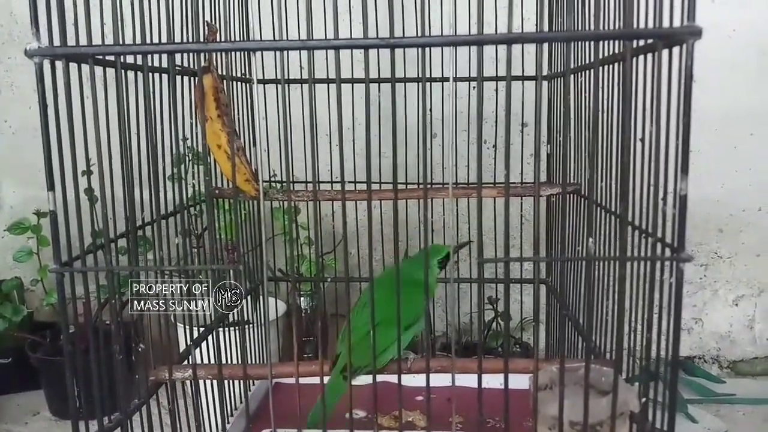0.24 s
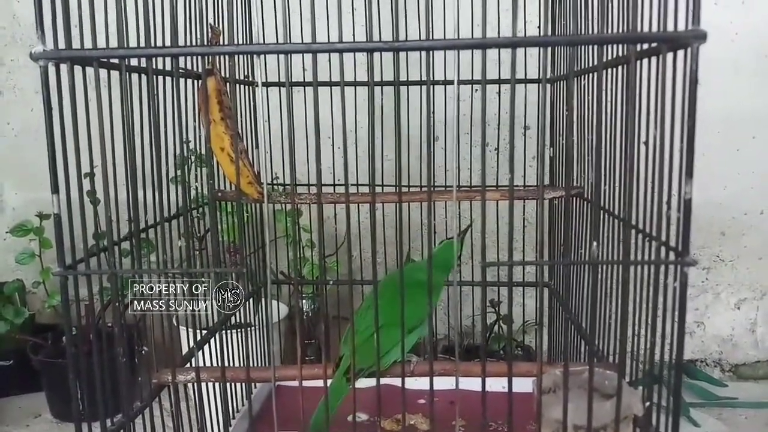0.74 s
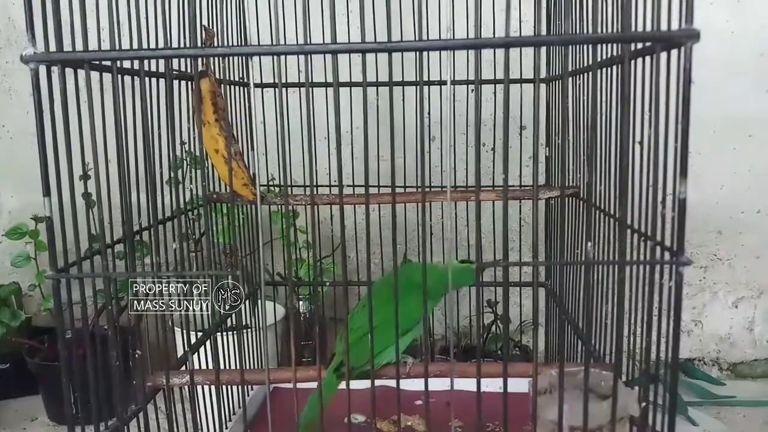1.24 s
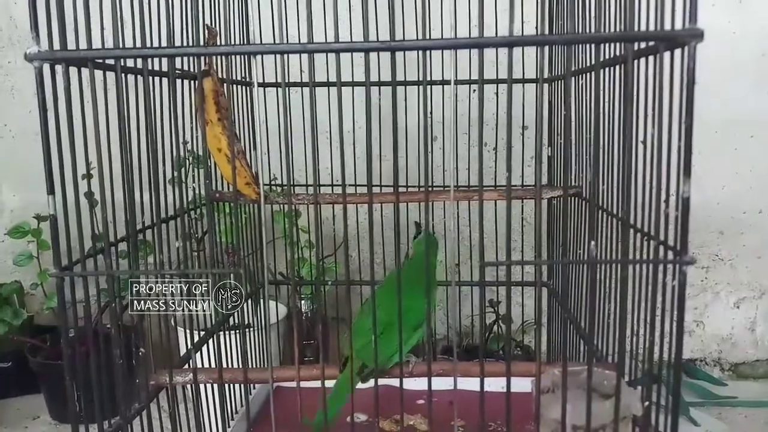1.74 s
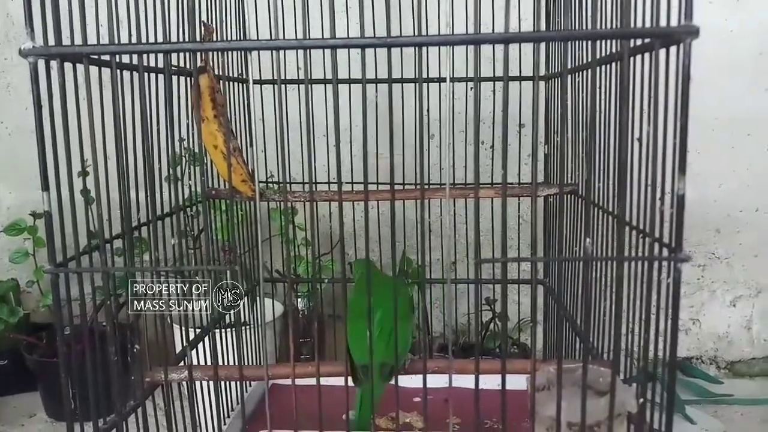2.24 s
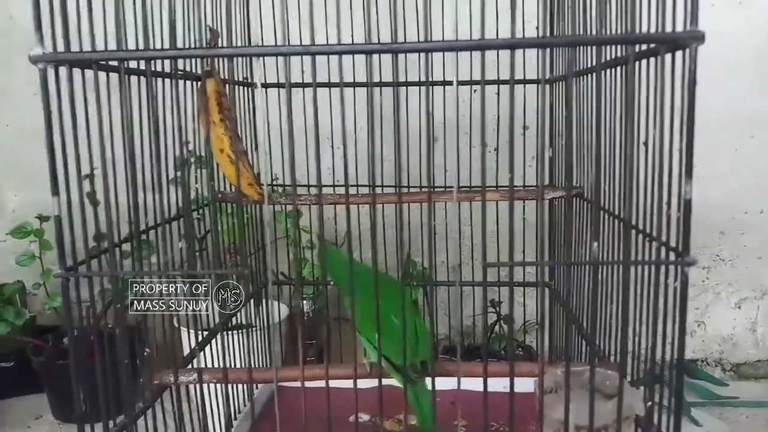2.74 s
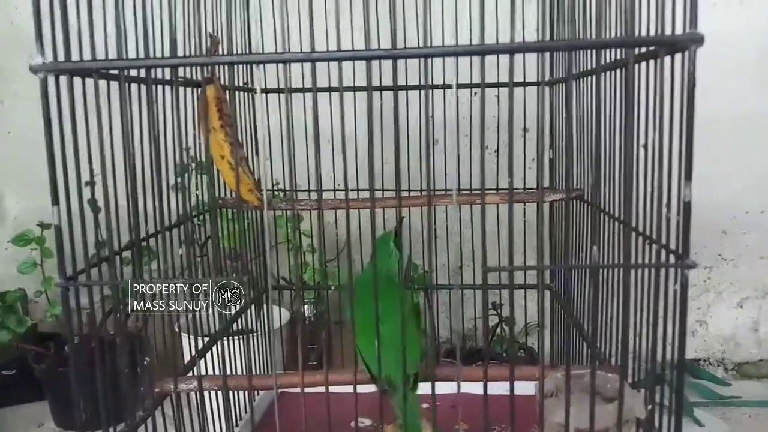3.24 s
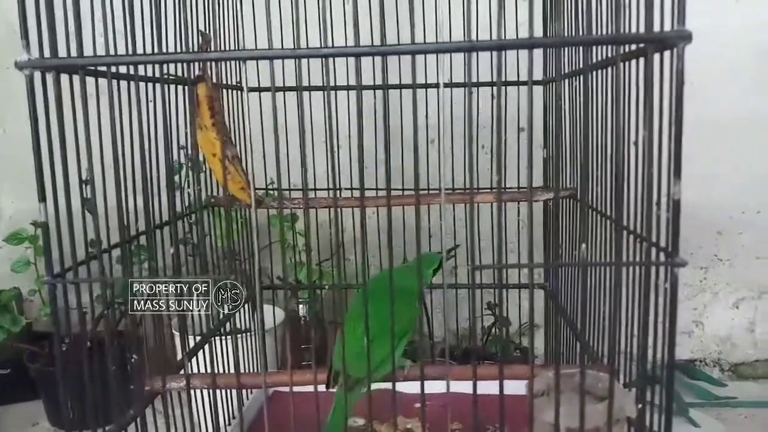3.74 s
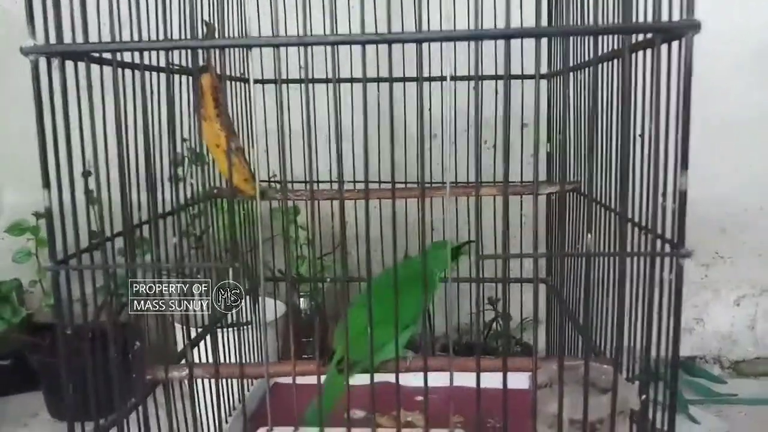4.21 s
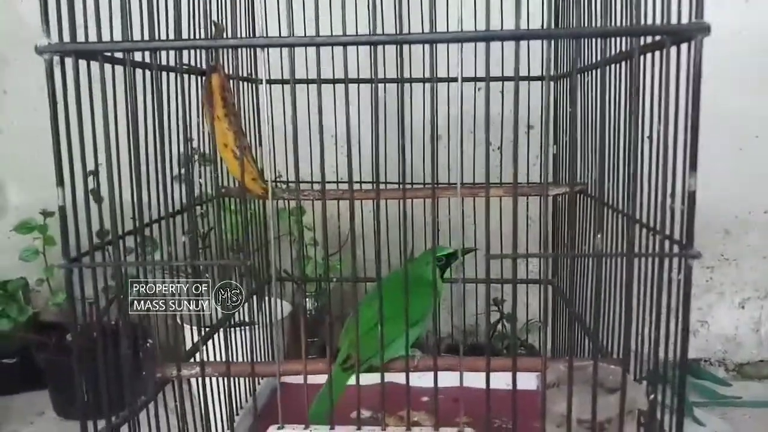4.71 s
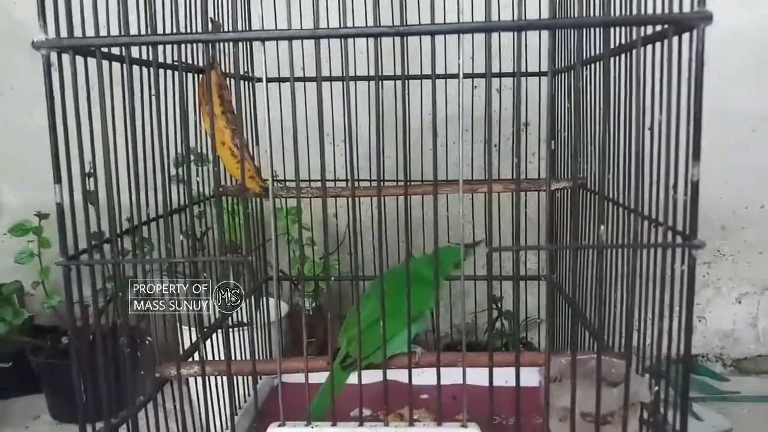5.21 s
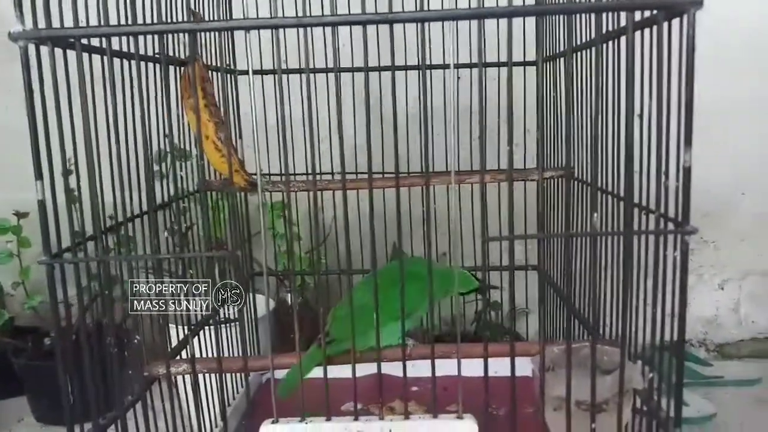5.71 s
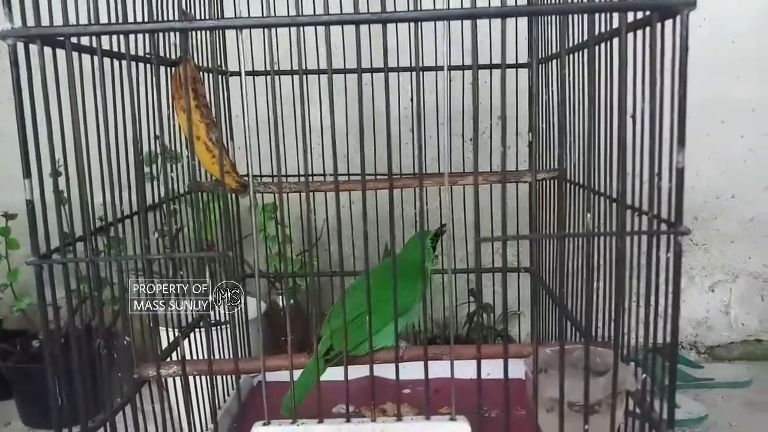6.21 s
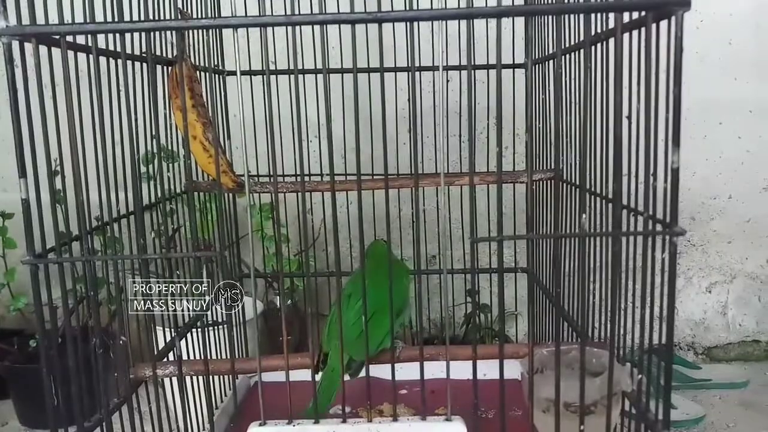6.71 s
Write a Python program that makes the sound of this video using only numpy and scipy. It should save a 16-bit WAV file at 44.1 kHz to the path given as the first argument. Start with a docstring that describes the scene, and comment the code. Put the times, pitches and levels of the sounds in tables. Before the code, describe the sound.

Soft bird chirps, scratchy rasps and light perch hops with ringing wires, then sudden piercing squawks that overload the microphone, over faint room hum.

```python
"""A songbird in a wire cage beside a hard wall, heard on two microphones over a low hum and faint hiss (noise, drones).
Thin whistles (near sines) and sliding chirps open; hops scuff the perch and ring the wires (noise, sines).
Two scratchy slurs climb, then dry rasps rattle (noise, buzz), more chirps and rasps following to the end.
Four loud squawks, two near the middle and two late, come from two coupled harmonic voices;
they overload the microphone and pull its automatic gain down."""
import sys
import numpy as np
from scipy import signal
from scipy.fft import rfft, irfft
from scipy.io import wavfile
from scipy.ndimage import uniform_filter1d

SR = 44100
rng = np.random.default_rng(int(sys.argv[2]) if len(sys.argv) > 2 else 0)


def file_out(sig):
    """Save sig as 16-bit WAV at sys.argv[1]."""
    # one column per channel
    cols = np.atleast_2d(sig).T
    # limit, then scale
    lim = np.clip(cols, -1, 1)
    pcm = np.round(lim * 32767).astype(np.int16)
    wavfile.write(sys.argv[1], SR, pcm)


N = 306936
TIME = np.arange(N) / SR
CUTOFF_HZ = 15400   # top of the recorded band

# spectrum of the dry, scratchy noise in the voice: hz, level_db
RASP_SPECTRUM = [(710, -68), (1200, -34), (1650, -29), (1870, -21.5), (3090, -20), (4160, 2), (4470, -2.5),
                 (5220, -5), (6960, -19), (7400, -33), (8550, -24.5), (14000, -48)]
# response of the vocal tract and open beak: hz, level_db
TRACT_RESPONSE = [(1200, -42), (1800, -44), (2130, -21), (2420, -17), (3000, -1.5), (3600, 8), (4400, 3.5),
                  (5100, -3), (5900, -11.5), (6700, -27.5), (7400, -26), (9000, -17.5), (10200, -32),
                  (13000, -34.5), (15000, -49.5)]


def from_db(db):
    """Amplitude factor of a level in dB."""
    return 10 ** (np.asarray(db) / 20)


def rms_one(x):
    """Scale a sound to rms 1."""
    return x / np.sqrt(np.mean(x ** 2) + 1e-20)


def at_hz(points, hz):
    """Read a table on a log-frequency axis."""
    table_hz, value = np.transpose(points)
    return np.interp(np.log(np.maximum(hz, 1)), np.log(table_hz), value)


def ramp(t, length_s):
    """From 0 to 1 over a given time, then held."""
    return np.clip(t / length_s, 0, 1)


def coloured(x, spectrum):
    """Give a sound a spectrum that falls away beyond its ends; rms 1."""
    hz = np.arange(N // 2 + 1) * SR / N + 1
    low_end = 1 + (.8 * spectrum[0][0] / hz) ** 8
    high_end = 1 + (.8 * hz / spectrum[-1][0]) ** 8
    gain = from_db(at_hz(spectrum, hz)) / np.sqrt(low_end * high_end)
    return rms_one(irfft(rfft(x) * gain, N))


def wobble(rate_hz, size):
    """Random motion up to a given rate, its filter settled beforehand; rms 1."""
    sos = signal.butter(3, min(rate_hz, SR / 4), fs=SR, output="sos")
    return rms_one(signal.sosfilt(sos, rng.standard_normal(size + SR // 4))[SR // 4:])


def stereo_noise(alike):
    """Two white noises with a given likeness (0-1)."""
    mid, side = rng.standard_normal((2, N))
    alike = np.clip(alike, 0, 1)
    return np.sqrt(1 + alike) * mid + np.sqrt(1 - alike) * side * np.array([[1], [-1]])


def add(out, start_s, sound):
    """Mix a sound in at its time."""
    i = max(int(start_s * SR), 0)
    out[i:i + len(sound)] += sound[:N - i]


def drone(hz, width_hz):
    """A tone whose strength and phase wander, which spreads it into a narrow band."""
    phase = 2 * np.pi * hz * TIME
    return wobble(width_hz, N) * np.sin(phase) + wobble(width_hz, N) * np.cos(phase)


def background(hum_db=-42.5, air_db=-53):
    """A steady low rumble with tones that come and go in it, under faint hiss."""
    # low hum of the room: hz, level_db
    hum_spectrum = [(15, -41), (25, -20.5), (81, -4.5), (107, -2.5), (140, -0.5), (181, 0), (248, -5),
                    (297, -6.5), (407, -14.5), (452, -14.5), (574, -13.5), (647, -21), (900, -27),
                    (1170, -46.5), (1980, -120)]
    # faint hiss: hz, level_db
    air_spectrum = [(600, -27), (1000, -8.5), (2000, -8), (4000, -7.5), (7000, -17.5), (10500, -21.5),
                    (12500, -27), (16000, -59)]
    # wavering tones in the hum: hz, width_hz, level_db, peak_s, half_width_s (down to 1/e)
    drone_table = [(88.6, 3, -51, 3.2, 1), (87, 3, -44, 6.4, 0.49), (152.2, 5, -46, 1.9, 2.1),
                   (191, 4, -44, 2.07, 1.6), (318, 40, -46, 3.42, 0.33), (219, 64, -45, 5.9, .35)]
    hum = from_db(hum_db) * coloured(stereo_noise(alike=0.91), hum_spectrum)
    for hz, width_hz, db, peak_s, half_s in drone_table:
        swell = np.exp(-((TIME - peak_s) / half_s) ** 2)
        hum = hum + from_db(db) * swell * drone(hz, width_hz)
    air = from_db(air_db) * coloured(stereo_noise(alike=0.27), air_spectrum)
    return hum * from_db([[-1.1], [1.1]]) + air * from_db([[-2.2], [2.2]])


def hops(wire_db=-6, wire_spread_db=2.2, flutter_db=4.0):
    """An uneven scuff of claws and feathers; the cage wires ring as decaying sines."""
    # feet and wings on perch and wires: start_s, level_db, decay_s (to -60 dB), attack_s, tilt_db_per_octave
    hop_table = [(.412, -34.5, 0.11, 0.0047, 0.5), (1.016, -33.5, 0.037, 0.0011, 3.5),
                 (1.347, -23, 0.093, 0.0076, 1), (1.383, -29, 0.058, .005, 5),
                 (1.74, -34, 0.48, 0.034, 2.5), (1.809, -38, 0.68, 0.026, 5), (1.972, -40, 0.25, 0.0041, 4),
                 (3.031, -34.5, 0.4, .002, -1.5), (3.12, -37.5, 0.18, 0.013, 16),
                 (3.191, -40.5, 0.11, 0.0039, -4.5), (5.286, -26.5, 0.16, 0.00087, 4)]
    # spectrum of a scuff before its tilt: hz, level_db
    scuff_spectrum = [(200, -20), (700, -2.5), (1300, -3.5), (2300, 6), (4000, 0.5), (6400, -3.5),
                      (9000, -11), (14000, -30)]
    # resonances of the cage wires: hz, level_db, t60_s
    wire_table = [(1960, -25, .12), (2520, -5, 0.12), (3300, 0.5, 0.22), (4660, 12, 0.29), (4920, -7, 0.1),
                  (6100, 14, 0.19), (7200, -13, 0.13), (10500, -21, 0.046)]
    out, t = np.zeros(N), TIME[:SR // 2]
    for start_s, db, decay_s, attack_s, tilt in hop_table:
        tilted = [(hz, level + tilt * np.log2(hz)) for hz, level in scuff_spectrum]
        scuff = coloured(rng.standard_normal(N), tilted)[:len(t)]
        scuff = scuff * from_db(-60 * t / decay_s + flutter_db * wobble(79, len(t)))
        ring = 0
        for hz, level, t60_s in wire_table:
            wire_level_db = level - 60 * t / t60_s + rng.normal(0, wire_spread_db)
            ring = ring + from_db(wire_level_db) * np.sin(2 * np.pi * hz * t)
        sound = scuff + from_db(wire_db) * ring / abs(ring).max()
        add(out, start_s, from_db(db) * ramp(t, attack_s) * sound)
    return out


def syrinx(hz, rough, jitter, jitter_hz):
    """Phase of a vibrating membrane whose pitch shakes as it gets rough."""
    shaken_hz = hz * (1 + jitter * rough * wobble(jitter_hz, len(hz)))
    return 2 * np.pi * np.cumsum(shaken_hz) / SR


def pure_voice(hz, rough, overtone_db=-32):
    """A near sine with a faint octave, fainter still above 3500 Hz."""
    phase = syrinx(hz, rough, jitter=0.24, jitter_hz=503)
    octave = from_db(overtone_db) * np.sin(2 * phase) * np.minimum(1, (3500 / hz) ** 2)
    return np.sqrt(2) * (np.sin(phase) + octave)


def harsh_voice(hz, rough, pull=0, slope_db=4.5, shimmer=0.53, smear=0.7):
    """A harmonic stack: the tract favours whichever harmonic lies near 4 kHz; weaker ones are smeared."""
    phase = syrinx(hz, rough, jitter=0.073, jitter_hz=545) + pull
    k = np.arange(1, 8)[:, None]   # harmonic number
    harmonic_db = at_hz(TRACT_RESPONSE, k * hz) + slope_db * np.log2(k)
    gains = from_db(harmonic_db) * (k * hz < CUTOFF_HZ)
    # the pulse shape varies at random, which shakes the weak harmonics most
    weakness = np.log(gains.max(0) / (gains + 1e-4) + 1e-4)
    shake = smear * np.sqrt(np.maximum(rough, 0)) * weakness * wobble(246, len(hz))
    stack = (gains * np.sin(k * phase + shake)).sum(0)
    tone = stack / np.sqrt((gains ** 2).sum(0) / 2)
    return tone * (1 + shimmer * rough * wobble(1400, len(hz)))


def chirps(rough=0.18, bend=2.2):
    """Each chirp lingers near its first pitch, then slides ever faster, nearly always down."""
    # short calls: start_s, length_s, start_hz, end_hz, level_db
    chirp_table = [(0, 0.013, 4110, 2320, -30.5), (0.357, 0.028, 4150, 3350, -30.5),
                   (0.409, .035, 1332, 1090, -44), (0.421, 0.05, 3545, 3120, -40),
                   (1.243, .04, 5060, 5150, -33), (1.551, 0.14, 3758, 2970, -26.5),
                   (1.816, .12, 3690, 3267, -24), (2.941, 0.028, 1182, 990, -37.5),
                   (3.111, 0.046, 4180, 2735, -19), (3.692, 0.056, 3956, 2960, -24),
                   (4.16, 0.066, 3890, 2870, -24.5), (4.632, 0.053, 4075, 2840, -21),
                   (5.082, 0.077, 3620, 3320, -27), (5.52, 0.08, 3733, 3426, -28),
                   (6.768, 0.051, 3704, 2860, -26)]
    out = np.zeros(N)
    for start_s, length_s, start_hz, end_hz, db in chirp_table:
        u = np.linspace(0, 1, int(length_s * SR))
        voice = pure_voice(start_hz + (end_hz - start_hz) * u ** bend, rough)
        add(out, start_s, voice * from_db(db) * signal.windows.tukey(len(u), .7))
    return out


def rasps(buzz_hz=2090, rough=.6, rattle_db=2.5, swell_db=4):
    """Chaotic vibration: rattling noise mixed with a rough buzzing tone; each rasp swells as it goes."""
    # dry rasps: start_s, length_s, level_db, buzz_power_share (0-1)
    rasp_table = [(2.134, 0.072, -30, 1), (2.203, 0.053, -28, 0), (2.275, 0.05, -25, 0.36),
                  (2.333, 0.068, -26.5, 0), (2.416, 0.042, -27.5, 0.47), (2.491, 0.05, -29, 0.18),
                  (3.104, 0.052, -38.5, 1), (3.684, 0.052, -31.5, 1), (4.949, 0.15, -28, 0.23),
                  (5.34, 0.23, -30.5, 0.31), (5.736, 0.18, -25, 0.22)]
    out = np.zeros(N)
    rattle = from_db(rattle_db * wobble(170, N))
    noise = coloured(rng.standard_normal(N) * rattle, RASP_SPECTRUM)
    for start_s, length_s, db, share in rasp_table:
        n, share = int(length_s * SR), np.clip(share, 0, 1)
        buzz = harsh_voice(np.full(n, buzz_hz), rough, slope_db=-11.0)
        mixed = np.sqrt(share) * buzz + np.sqrt(1 - share) * noise[int(start_s * SR):][:n]
        effort = from_db(db + swell_db * np.linspace(-.5, .5, n)) * signal.windows.tukey(n, .4)
        add(out, start_s, mixed * effort)
    return out


def whistles(rough=0.019, wander_hz=55, tremble_db=2.0):
    """Soft high notes that waver slowly, tremble a little and dip as they end."""
    # long thin whistles: start_s, length_s, centre_hz, wavers_per_s, level_db, swell_db (start to end)
    whistle_table = [(0.298, .318, 7044, 5.4, -30.5, 2.5), (0.779, 0.25, 7000, 6.6, -27.5, -1.5)]
    waver_hz, first_crest_s = 103.8, .024   # depth of the waver; its first crest after the start
    attack_s, release_s, end_drop_hz = 0.03, 0.014, 380
    out = np.zeros(N)
    for start_s, length_s, centre_hz, rate_hz, db, swell_db in whistle_table:
        t = TIME[:int(length_s * SR)]
        held = ramp(length_s - t, release_s)   # 1, falling to 0 at the end
        waver = waver_hz * np.cos(2 * np.pi * rate_hz * (t - first_crest_s))
        wander = wander_hz * wobble(39.7, len(t))
        voice = pure_voice(centre_hz + waver + wander - end_drop_hz * (1 - held) ** 2, rough)
        level = from_db(db + swell_db * (t / length_s - .5) + tremble_db * wobble(49, len(t)))
        add(out, start_s, voice * level * ramp(t, attack_s) * np.sqrt(held))
    return out


def slurs(attack_s=0.02, release_s=0.02, scratch_db=-3, climb_s=.056, rough=0.47, top_db=-4):
    """A scratchy start slides up and thins into a clean, softer tone."""
    # slurs that climb to a clean top: start_s, length_s, start_hz, top_hz, level_db
    slur_table = [(1.184, 0.075, 3604, 6530, -26), (1.296, 0.082, 3850, 6530, -24.5)]
    out, noise = np.zeros(N), coloured(rng.standard_normal(N), RASP_SPECTRUM)
    for start_s, length_s, start_hz, top_hz, db in slur_table:
        t = TIME[:int(length_s * SR)]
        climb = ramp(t, climb_s) ** 2
        scratch = from_db(scratch_db) * (1 - climb) * noise[int(start_s * SR):][:len(t)]
        tone = pure_voice(start_hz + (top_hz - start_hz) * climb, rough * (1 - climb ** 2))
        fades = ramp(t, attack_s) * ramp(length_s - t, release_s)
        add(out, start_s, (tone + scratch) * from_db(db + top_db * climb) * fades)
    return out


def sweep(length_s, start_hz, crest_hz, rise_s, sag, drop, db, attack_s, rough, second_db,
          ease=2.05, wander=0.0054):
    """Pitch, level, roughness and second voice: strained in the climb, cleaner on the crest, then broken."""
    attack_depth_db, swell_db_per_s = 20, 39   # starts this far down, then swells up to its crest
    strain_rough, strain_second_db = 0.324, 13   # added while the pitch is still far from the crest
    closing_s, closing_db, closing_rough = 0.0157, -7.5, 0.32   # the note drops, fades and roughens
    t = np.arange(int(length_s * SR)) / SR
    strain = 1 - ramp(t, rise_s)
    closing = ramp(t - length_s + closing_s, closing_s)
    hz = crest_hz + (start_hz - crest_hz) * strain ** ease - sag * np.maximum(t - rise_s, 0)
    hz = hz * (1 - drop * closing) * (1 + wander * wobble(45.8, len(t)))
    onset_db = -attack_depth_db * (1 - ramp(t, attack_s)) - swell_db_per_s * rise_s * strain
    level_db = db + onset_db + closing_db * closing
    roughness = rough + strain_rough * strain + closing_rough * closing
    return hz, level_db, roughness, second_db + strain_second_db * strain


def squawks(second_ratio=1.112, hiss_db=-18, coupling=0.39, second_fundamental_db=-3.5,
            difference_tone_db=-4):
    """The two sides of the syrinx sound a tone apart; the second tugs at the first, which breeds sidebands."""
    # sweeps of four squawks (three run together in the first, two in the second):
    # start_s, length_s, start_hz, crest_hz, rise_s, sag_hz_per_s, closing_drop (share of pitch),
    # level_db, attack_s, crest_roughness (0-1), crest_second_voice_db
    sweep_table = [(3.763, 0.17, 1972, 2363, .18, -5, 0, -1.5, 0.029, .05, -16.5),
                   (3.913, 0.054, 2250, 2820, .056, 5, 0.0046, -4.5, 0.0085, .16, -20),
                   (3.94, .103, 2430, 3595, 0.054, 396, .11, -1, 0.031, 0.03, -52),
                   (4.265, 0.076, 1850, 2760, .085, 4, 0, -6, 0.021, .14, -18),
                   (4.306, .125, 2900, 4955, .075, 104.5, .04, 1, .055, .04, -44.5),
                   (5.889, .228, 754, 2169, 0.13, 404, .11, 0, 0.027, .09, -16.5),
                   (6.272, 0.24, 848, 2232, .134, 1305, .11, 0.5, 0.028, 0.05, -22.5)]
    out, hiss = np.zeros(N), coloured(rng.standard_normal(N), TRACT_RESPONSE)
    for start_s, *shape in sweep_table:
        hz, db, rough, second_db = sweep(*shape)
        beat = syrinx(2 * (second_ratio - 1) * hz, rough, jitter=0.655, jitter_hz=106.7)
        pull = coupling * from_db(second_db / 2) * np.sin(beat)
        first = harsh_voice(hz, rough, pull=pull)
        # the weaker side radiates more of its fundamental
        second_hz = second_ratio * hz
        low = np.sin(syrinx(second_hz, rough, jitter=0.11, jitter_hz=396))
        low = low * np.minimum(hz / 2150, 1) ** 4
        # roughness adds a difference tone below the first voice
        below = np.sin(syrinx((2 - second_ratio) * hz, rough, jitter=0.029, jitter_hz=400))
        below = below * rough * np.minimum(hz / 2050, 1) ** 8
        second = harsh_voice(second_hz, rough, slope_db=13.5)
        second = second + from_db(second_fundamental_db) * low + from_db(difference_tone_db) * below
        turbulence = from_db(hiss_db) * rough * np.roll(hiss, rng.integers(N))[:len(hz)]
        voices = first + from_db(second_db) * second + turbulence
        add(out, start_s, voices * from_db(db) * signal.windows.tukey(len(hz), .06))
    return out


def narrow_dip(x, dip_hz=5880, dip_q=9.3, dip_share=0.71):
    """A partial dip near 5.9 kHz thins the squawks in a narrow band."""
    notched = signal.lfilter(*signal.iirnotch(dip_hz, dip_q, fs=SR), x)
    return x + np.clip(dip_share, 0, 1) * (notched - x)


def room(x, early_db, tail_db, early_s=0.05, apart=1.0):
    """Direct sound, wall and floor echoes partly alike at both microphones, and a diffuse tail."""
    # reverberation time: hz, t60_s
    t60_table = [(300, 1), (2000, 0.65), (4500, 0.23), (8000, 0.6), (15000, 0.22)]
    t = TIME[:SR]
    edges_hz = np.geomspace(150, 18000, 8)
    tail = 0
    for low, high in zip(edges_hz, edges_hz[1:]):
        sos = signal.butter(2, [low, high], "band", fs=SR, output="sos")
        band = signal.sosfilt(sos, rng.standard_normal((2, SR)))
        tail = tail + band * from_db(-60 * t / at_hz(t60_table, np.sqrt(low * high)))
    strengths = rng.standard_normal(SR) + apart * rng.standard_normal((2, SR))
    arrivals = rng.random(SR) < 900 / SR   # about 900 echoes per second
    early = strengths * arrivals * from_db(-60 * t / early_s)
    # echoes start after 2 ms, the tail after 8 ms; levels are relative to the direct sound
    response = from_db(tail_db) * rms_one(tail * (t > .008)) + from_db(early_db) * rms_one(early * (t > .002))
    response = response / np.sqrt(SR)
    total = np.sqrt(1 + from_db(2 * early_db) + from_db(2 * tail_db))
    return (x + signal.fftconvolve(x[None], response, axes=1)[:, :N]) / total


def scene():
    """Place each source in the room, a little stronger in the right microphone."""
    cage = room(hops(), early_db=-3.0, tail_db=3.5) * from_db([[-1.5], [1.5]])
    soft = room(chirps() + rasps(), early_db=4, tail_db=7) * from_db([[-.8], [.8]])
    thin = room(whistles() + slurs(), early_db=4.5, tail_db=6.5) * from_db([[-2.3], [2.3]])
    loud = room(narrow_dip(squawks()), early_db=0, tail_db=-2.5, apart=2.66) * from_db([[-1.2], [1.2]])
    return background() + cage + soft + thin + loud


def gain_control(x, threshold_db=-4.5, attack_s=0.034, recovery_db_per_s=5):
    """Loud sound turns the gain down; it creeps back afterwards."""
    power = uniform_filter1d((x ** 2).mean(0), SR // 50)   # over 20 ms
    level_db = 10 * np.log10(np.maximum(power, 1e-12))
    over_db = np.maximum(level_db - threshold_db, 0)
    recovery_db = recovery_db_per_s * TIME
    held_db = np.maximum.accumulate(over_db + recovery_db) - recovery_db
    r = np.exp(-1 / (attack_s * SR))
    return x * from_db(-signal.lfilter([1 - r], [1, -r], held_db))


def record(dry):
    """Automatic gain, overload at full scale, and a steep top cut."""
    fine = signal.resample_poly(gain_control(dry), 4, 1, axis=1)   # clip at 4x rate to limit aliasing
    clipped = signal.resample_poly(np.clip(fine, -1, 1), 1, 4, axis=1)
    top_cut = signal.firwin(201, CUTOFF_HZ, fs=SR)
    return signal.fftconvolve(clipped, top_cut[None], "same", axes=1)


dry = scene()
out = record(dry)
file_out(out)
```